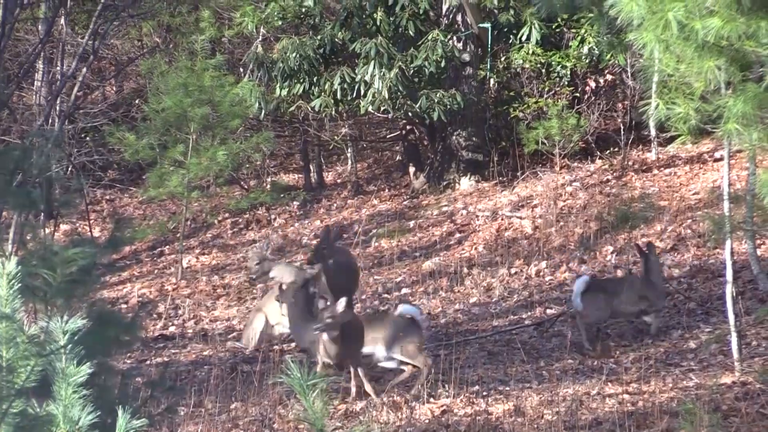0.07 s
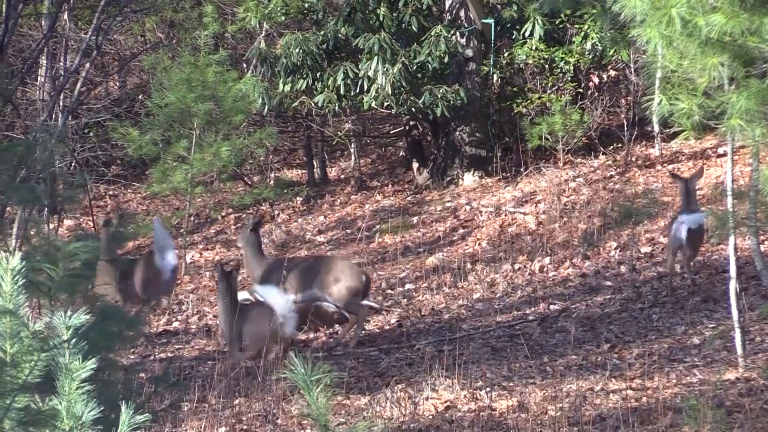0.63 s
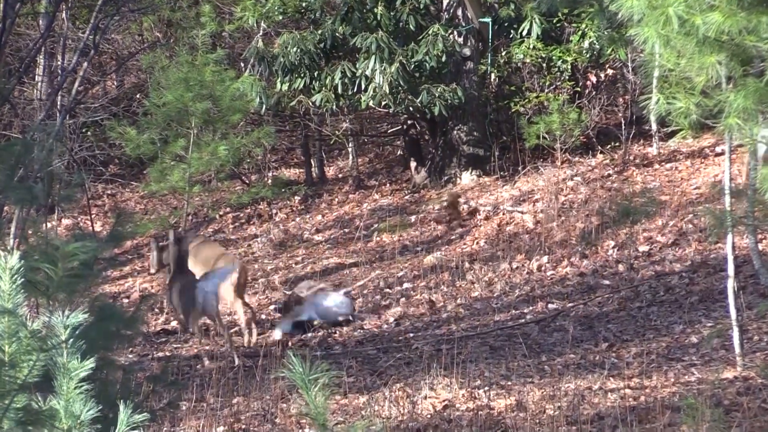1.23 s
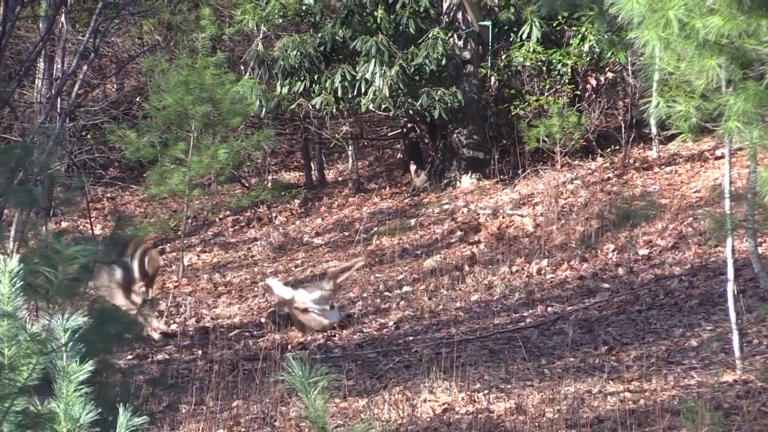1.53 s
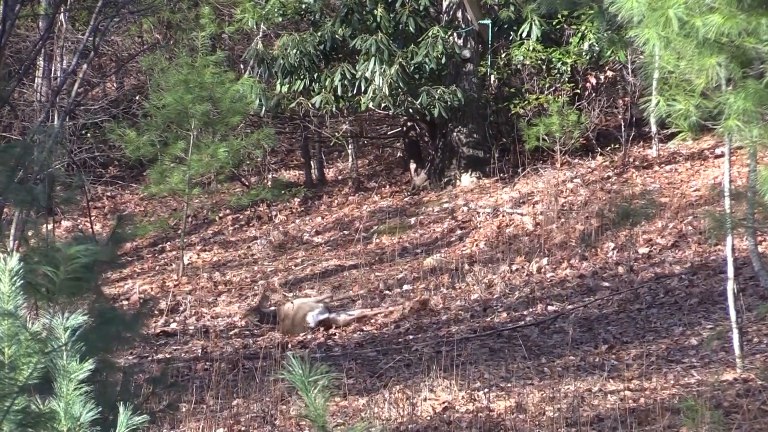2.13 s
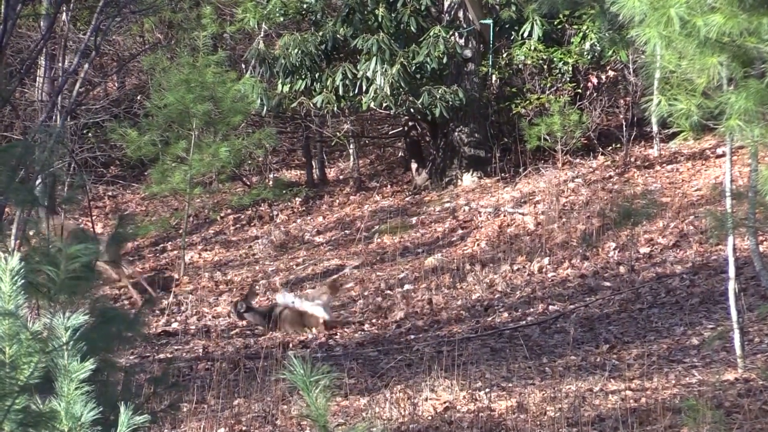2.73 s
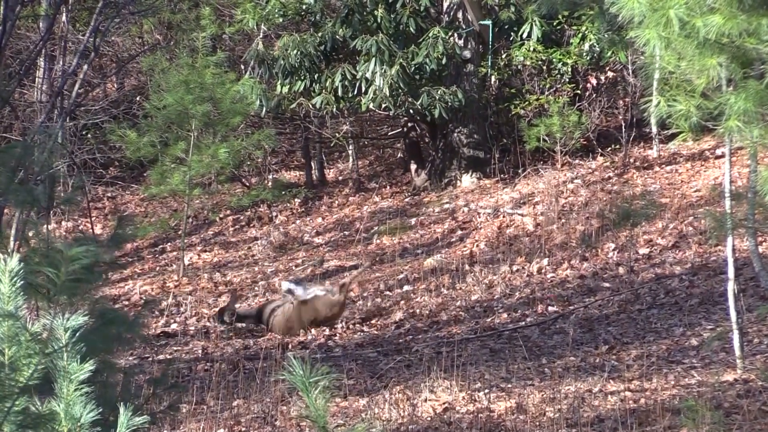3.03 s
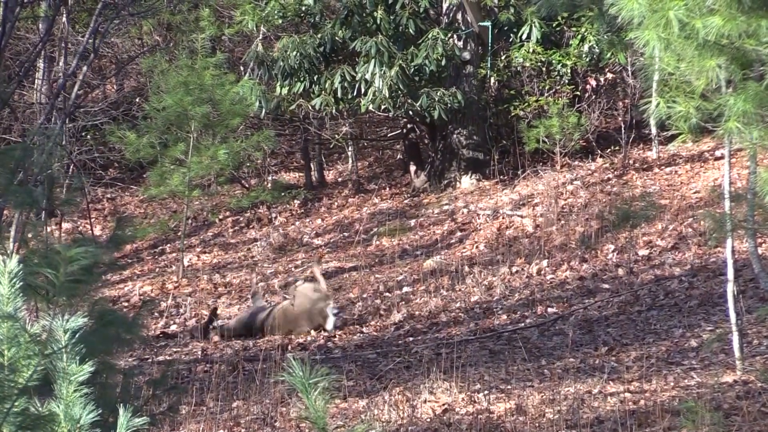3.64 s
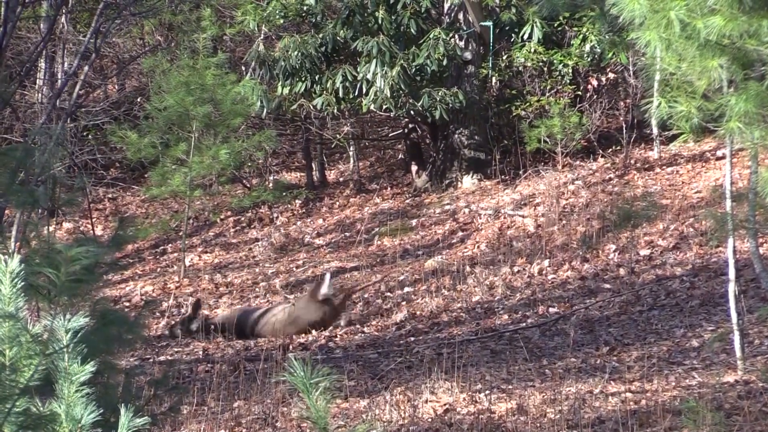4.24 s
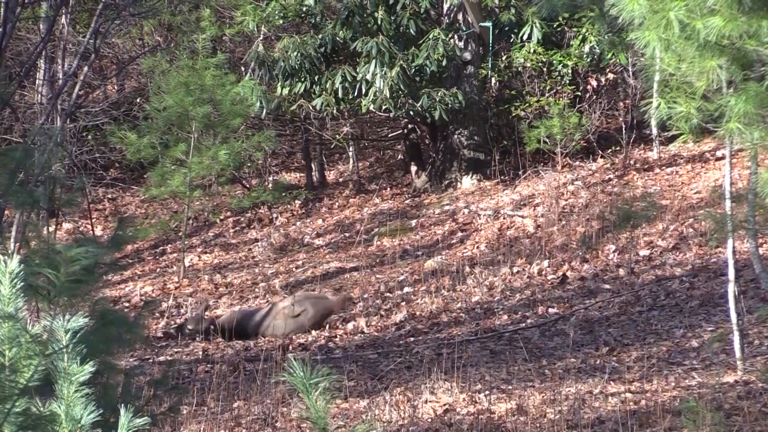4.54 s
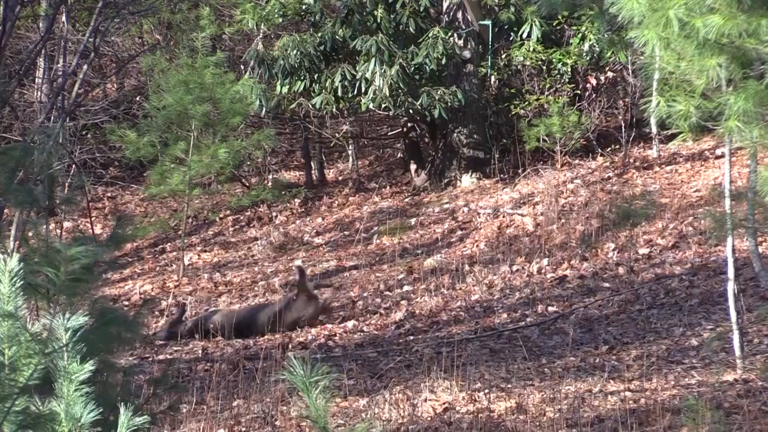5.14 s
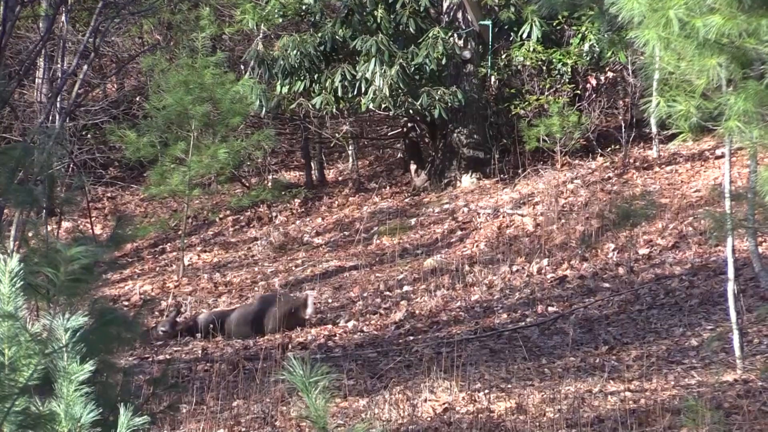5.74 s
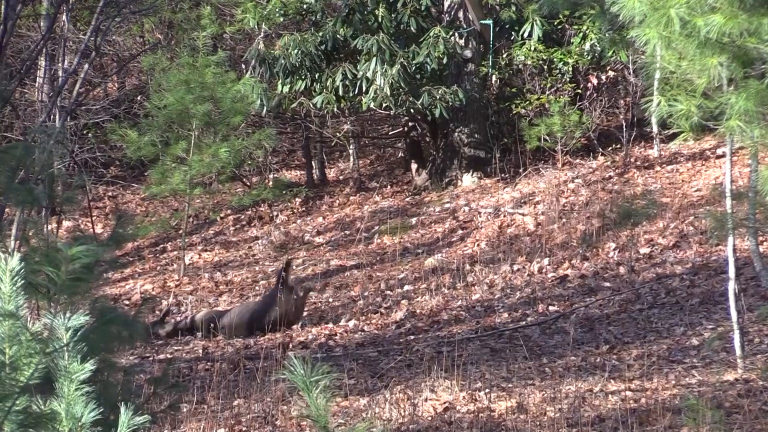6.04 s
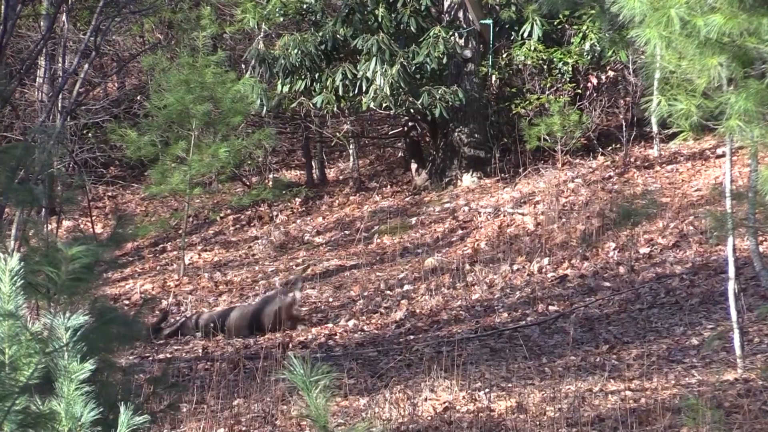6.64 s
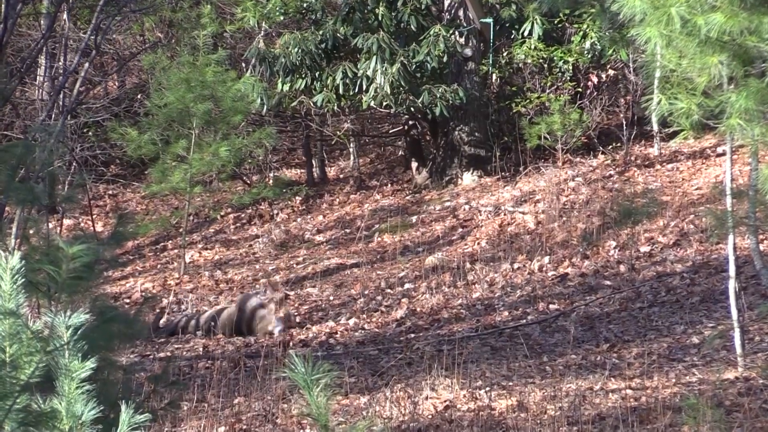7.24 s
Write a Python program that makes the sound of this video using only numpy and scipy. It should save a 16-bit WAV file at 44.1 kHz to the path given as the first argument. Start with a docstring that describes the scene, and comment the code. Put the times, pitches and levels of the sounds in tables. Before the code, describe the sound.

From the start, the echo of a rifle shot rolls back from wooded slopes, with a few sharper slaps, booming most around 1.4 seconds, then growing deeper and duller as it fades past 3 seconds. Distant deer rustle dry leaves faintly from about 1 second, with soft, low kicks on the ground around 2.7 to 4 seconds. Close by, a sleeve scuffs and steel ticks at 3.2 seconds. The bolt lifts with a clack at 3.6, then scrapes back to a very loud, sharp stop at 4.1. The brass case pings and bounces on hollow boards at 4.4, 4.7 and 5 seconds, ringing briefly in the wooden shelter. The bolt slides forward with a bright clatter at 5.8 and locks at 6.1. Faint leaf swishes follow, and the safety clicks lightly at 7.1. Soft air moves in the trees underneath. Everything is heard on the right side.

```python
"""In a wooden shelter among wooded hills, a rifle shot is heard rolling away as echoes from the slopes.
Far off, deer run and kick in dry leaves. Close by, a sleeve and hand scuff as they find the bolt. Steel
strikes and scrapes steel, the spent brass case rings in its modes and bounces on boards, a new round
slides home and the safety clicks. Soft air moves in the trees; a limiter ducks the woods at hard blows."""
import sys
import numpy as np
from scipy import signal
from scipy.fft import next_fast_len
from scipy.io import wavfile
from scipy.ndimage import uniform_filter1d

SR = 44100
rng = np.random.default_rng(int(sys.argv[2]) if len(sys.argv) > 2 else 0)


def file_out(sig):
    """Save sig as 16-bit WAV at sys.argv[1]."""
    # one column per channel
    cols = np.atleast_2d(sig).T
    # limit, then scale
    lim = np.clip(cols, -1, 1)
    pcm = np.round(lim * 32767).astype(np.int16)
    wavfile.write(sys.argv[1], SR, pcm)


N = 325899
TIME = np.arange(N) / SR
# spectrum of dry rustling, leaves and cloth alike: frequency_hz, level_db
RUSTLE_SPECTRUM = [(300, -17), (1000, 2.5), (2000, -0.5), (3400, -3.5), (4500, -1), (6500, -4), (9000, -9),
                   (12000, -17.5), (15500, -23.5)]


def shot_echoes(rise_db_per_s=80.5, fade_db_per_s=22, air_loss=3.0, air_power=1.39, start_s=0.063):
    """Scattering and air absorption: trees and slopes return the shot, and longer paths lose treble."""
    # wooded slopes, each returning one swell of scattered sound: crest_s, level_db
    slopes = [(0.02, -18), (0.17, -27), (0.33, -23), (0.48, -20), (0.698, -17), (0.81, -20.5),
              (0.979, -17.5), (1.1, -17), (1.369, -17), (1.61, -17.5), (1.86, -19.5), (2.069, -19),
              (2.18, -25), (2.36, -23), (2.61, -29)]
    # sharp reflections from bare faces: start_s, level_db
    slaps = [(0.163, 4.5), (0.561, -4), (1.123, 2), (1.803, 4), (2.315, -13), (2.7, -8)]
    # spectrum of the roll at its start: frequency_hz, level_db
    spectrum = [(24, -55), (40, -53.5), (166, -7.5), (197, -4.5), (217, -1), (298, -4), (499, -5),
                (579, -3.5), (992, -11), (1740, -14), (3550, -25), (4320, -27), (7970, -44), (14000, -70)]
    roll = power_sum(swell(s, db, rise_db_per_s, fade_db_per_s) for s, db in slopes)
    scatter = roll * grains(per_s=9000)
    for s, db in slaps:
        add(scatter, s, amp([db]))
    hz, t, bands = signal.stft(scatter, SR, nperseg=2048)
    hz = hz[:, None]
    # the roll booms most in its middle; the boom then sinks as echoes come from farther off
    boom_s, boom_spread_s, boom_peak_db = 1.4, 1.14, 7.5
    boom_hz, boom_width_octaves, sink_octaves_per_s = 330, 0.49, 0.78
    centre_hz = boom_hz * 2 ** (-sink_octaves_per_s * np.maximum(t - boom_s, 0))
    off_centre = np.log2((hz + 1) / centre_hz) / boom_width_octaves
    boom_db = boom_peak_db * np.exp(-((t - boom_s) / boom_spread_s) ** 2 - off_centre ** 2)
    absorbed_db = air_loss * (hz / 1000) ** air_power * (t - start_s)
    gain = amp(curve_at(spectrum, hz) + boom_db - absorbed_db)
    gain /= np.sqrt(np.mean(gain ** 2, axis=0))  # the colour changes, the power is kept
    return signal.istft(bands * gain, SR, nperseg=2048)[1][:N]


def bolt_clicks(click_db=-4, knock_rise_s=0.0026):
    """Impact excitation: steel snaps on steel, and the modes of the stock knock after it."""
    # handling, unlocking, back stop, loading, locking, safety:
    # start_s, level_db, relative_knock_db, tilt_db_per_octave
    clicks = [(0.555, -18, -36, -7), (3.072, -23, -17, 2.5), (3.2013, -16, -4.5, -4.5),
              (3.2393, -13, -6.5, -5), (3.6264, -9.5, 10.5, 2), (3.631, -4.5, 11, 0), (3.6428, 6, 4.5, 1.5),
              (3.6472, 15.5, -17, -4), (4.0085, -16, 4, -5), (4.014, -7, 10.5, -5),
              (4.0367, -1.5, -6, -2.5), (4.073, -10, -2, 4), (4.095, -0.5, -3, -2), (4.100, 3, -8.5, 2),
              (4.129, 7.5, -16.5, -0.5), (4.1344, 23, 0.5, 5.5), (4.149, 19.5, 3, -2.5),
              (4.167, 7, -2.5, 4), (4.1737, 5, -20, -7), (5.5939, -17, -6.5, -3.5),
              (5.6279, -27, -12.5, -0.5), (5.753, -5.5, -12, 3.5), (5.7691, 14, -4, 0.5),
              (5.778, 15, -7, 5.5), (5.795, 4, 4, -2), (5.8281, 9, 0.5, -4), (5.8386, 12, -15, -0.5),
              (6.013, -13.5, -16, 0.5), (6.022, -2.5, 1, -1), (6.082, 5, -5, -1), (6.0822, 5, -8, -4),
              (6.187, -29, -22, -5.5), (7.048, -36, -1, 3), (7.0961, -10.5, -9, 1.5)]
    # spectrum of struck steel: frequency_hz, level_db
    steel = [(60, -32.5), (250, -11.5), (550, -11.5), (750, -5.5), (1100, 0.5), (1600, -2), (2100, -3.5),
             (2800, 3.5), (3700, -5), (4700, 1.5), (6300, -6.5), (9000, -8.5), (12000, -15.5), (15500, -27)]
    # modes of the rifle's body: pitch_hz, level_db, t60_s
    stock = [(570, -16, 0.028), (1036, -9, 0.071), (1123.5, -4.5, 0.067), (1580, -15.5, 0.077),
             (2970, -24.5, 0.036), (3240, -20.5, 0.022), (4150, -27, 0.046), (5140, -22.5, .035),
             (6000, -23, 0.033)]
    out = np.zeros(N)
    for s, db, knock_db, tilt in clicks:
        add(out, s, amp(db + click_db) * burst(steel, tilt, decay_ms=3.97, rise_ms=0.18))
        knock = ring(stock, detune=0.017)
        build_up = 1 - np.exp(-TIME[:len(knock)] / knock_rise_s)
        add(out, s, amp(db + knock_db) * knock * build_up)
    return out


def bolt_scrapes(growth_power=0.42, stop_decay_s=0.0066):
    """Sliding friction: the bolt scrapes louder as it gathers speed, then dies away at the stop."""
    # strokes of the bolt: start_s, stop_s, level_at_stop_db, tilt_db_per_octave
    strokes = [(3.975, 4.065, -27, 2), (4.065, 4.17, -16.5, 8), (5.641, 5.726, -32, 1),
               (5.721, 5.77, -11.5, 0.5), (5.786, 5.815, -10.5, -1), (6.035, 6.043, -15, 3.5)]
    # spectrum of sliding steel: frequency_hz, level_db
    spectrum = [(88, -52), (150, -25.5), (450, -11), (728, -19.5), (1030, 2.5), (1380, -4.5), (1800, -5.5),
                (2310, -12.5), (2500, -4.5), (3090, -11.5), (4050, -22), (4630, -8), (5610, -25.5),
                (6060, -20), (15000, -45)]
    out = np.zeros(N)
    t = TIME[:SR // 4]
    for start_s, stop_s, db, tilt in strokes:
        progress = np.minimum(t / (stop_s - start_s), 1)
        fade = np.exp(-np.maximum(start_s + t - stop_s, 0) / stop_decay_s)
        scrape = colour(grains(per_s=10000, spread_db=3)[:len(t)], spectrum, tilt)
        add(out, start_s, amp(db) * progress ** growth_power * fade * scrape)
    return out


def handle_thumps(rise_s=0.003):
    """Body resonance: lifting the bolt handle and locking it down each thump the whole rifle."""
    # blows of the handle: start_s, level_db
    blows = [(3.627, -10), (3.649, -5.5), (6.083, -6)]
    # low modes of the rifle: pitch_hz, level_db, t60_s
    modes = [(335, -22, 0.059), (464, -8.5, 0.11), (614, 1.5, 0.059), (762, -3, 0.045)]
    out = np.zeros(N)
    for s, db in blows:
        thump = ring(modes, detune=0.046)
        build_up = 1 - np.exp(-(TIME[:len(thump)] / rise_s) ** 2)
        add(out, s, amp(db) * thump * build_up)
    return out


def magazine_zing(zing_db=-2):
    """Free vibration: the magazine's steel lips ring as a round is stripped off."""
    # the round rattling up the feed ramp: start_s, level_db
    rattles = [(5.7518, -2.5), (5.7681, 15), (5.777, 6.5), (5.792, -15)]
    # modes of the lips: pitch_hz, level_db, t60_s
    lips = [(4620, -11, 0.073), (4650, -7.5, 0.045), (4590, -0.5, 0.028), (4700, -10, .04)]
    out = np.zeros(N)
    for s, db in rattles:
        add(out, s, amp(db + zing_db) * ring(lips, detune=0.012))
    return out


def case_bounces(impact_db=-4, hollow_db=-5, hollow_rise_s=0.0022):
    """Impact excitation: the falling case clatters on hollow boards and sets their modes ringing."""
    # strikes on the boards: start_s, level_db, relative_ring_db, tilt_db_per_octave, decay_ms
    bounces = [(4.3849, -3, -8, -3, 3), (4.7073, 0, 8, 9, 9.9), (4.7087, 7, -5.5, -4, 4.4),
               (4.7114, 2.5, 5.5, -3, 5.5), (4.72, -5, 1, -10, 4.2), (4.731, -4, -0.5, -6.5, 13),
               (5.0179, -9, -21, -1.5, 24.4), (5.029, -4.5, -7, -4, 17.5), (5.0942, -21, -12, -6.5, 34),
               (5.137, -27, -4, -5.5, 40), (5.2495, -38, -15, -3, 16)]
    # spectrum of a strike: frequency_hz, level_db
    spectrum = [(59, -51), (100, -42), (275, -20), (378, -30.5), (614, -10.5), (712, -25.5), (808, -17.5),
                (1290, -21), (1660, -8.5), (2130, -13.5), (3320, -13), (3850, -23), (4100, -17.5),
                (9740, -20), (15500, -40.5)]
    # modes of the boards: pitch_hz, level_db, t60_s
    boards = [(275, -19, .07), (450, -14, .05), (440, -18, .05), (530, -9, .045), (610, -9, .045),
              (880, -6, .03), (1130, -5, .03), (1410, 0, .03), (1490, 3, .03), (1680, 3, .03),
              (1830, -5, .025)]
    out = np.zeros(N)
    for s, db, ring_db, tilt, decay_ms in bounces:
        add(out, s, amp(db + impact_db) * burst(spectrum, tilt, decay_ms, rise_ms=0.58))
        hollow = ring(boards, detune=0.013)
        build_up = 1 - np.exp(-TIME[:len(hollow)] / hollow_rise_s)
        add(out, s, amp(db + ring_db + hollow_db) * hollow * build_up)
    return out


def case_ring(brass_db=-2):
    """Beating: the thin brass tube squeals on its way out, then rings in close pairs of modes."""
    # brass leaving the chamber: start_s, length_s, pitch_hz, level_db
    squeal = (4.052, .034, 13000, -24)
    # four split pairs of tube modes: pitch_hz, level_db, t60_s
    tube = [(7754, 0, .16), (7800, -7, .13), (9447, 0, .19), (9482, -10, .17), (11407, 0, .13),
            (11445, -9, .11), (14810, -8, .11), (14865, 0, .14)]
    # blows on the case: start_s, first_pair_db, second_pair_db, third_pair_db, fourth_pair_db
    blows = [(4.0965, -4, -27.5, -5, -29.5), (4.1765, -9, 1, -15, -6), (4.3856, -52, -25.5, -66, -52),
             (4.7088, -30.5, -8, -42.5, -51), (5.0185, -60.5, -53, -49, -28)]
    out = np.zeros(N)
    s, length_s, hz, db = squeal
    t = TIME[TIME < length_s]
    envelope = np.sin(np.pi * (t / length_s) ** 2)
    add(out, s, amp(db) * envelope * np.sin(2 * np.pi * hz * t))
    for s, *pair_db in blows:
        modes = [(hz, pair_db[k // 2] + db, t60) for k, (hz, db, t60) in enumerate(tube)]
        add(out, s, amp(brass_db) * ring(modes, detune=0.0002))
    return out


def shelter_reverb(x):
    """Reverberation: the wooden shelter adds a short diffuse tail, each band dying at its own rate."""
    # reverberation times: frequency_hz, t60_s
    decay_times = [(200, 0.29), (1000, 0.33), (4000, 0.33), (9000, 0.36), (15000, 0.23)]
    hz, t, bands = signal.stft(rng.standard_normal(SR // 2), SR, nperseg=256)
    decay = amp(-60 * t / curve_at(decay_times, hz)[:, None])
    tail = signal.istft(bands * decay, SR, nperseg=256)[1]
    return signal.fftconvolve(x, tail / np.linalg.norm(tail))[:N]


def scuffs_and_ticks():
    """Friction: a sleeve and hand scuff as they find the bolt, among light ticks and leaf crunches."""
    # scuffs (3.164-3.318 s), ticks and crunches: start_s, level_db, tilt_db_per_octave, decay_ms
    touches = [(2.016, -32, 2, 2), (3.164, -29.5, 0.5, 28), (3.254, -30.5, -1.5, 16),
               (3.301, -31.5, -2.5, 22), (3.318, -29.5, -3.5, 12), (3.841, -45, 5, 3), (3.974, -36, -7, 31),
               (4.337, -33.5, -1, 7.2), (6.813, -42.5, 0, 7.2), (6.83, -46.5, -1, 22), (7.058, -46, -2, 43)]
    out = np.zeros(N)
    for s, db, tilt, decay_ms in touches:
        add(out, s, amp(db) * burst(RUSTLE_SPECTRUM, tilt, decay_ms, rise_ms=0.47))
    return out


def leaf_rustle(rise_db=24.5, fade_db=15.5):
    """Superposition: countless tiny crackles of distant leaves blur into a swelling rustle."""
    # the herd bolting, then leaving: crest_s, level_db, rise_db_per_s, fade_db_per_s
    herd = (2, -48.5, 18.5, 10.5)
    # leaps and kicks that sweep the leaves: crest_s, level_db, length_s
    swishes = [(1.22, -47.5, 0.15), (1.428, -54, 0.082), (1.61, -52, 0.21), (1.84, -46, 0.55),
               (2.02, -43.5, 0.15), (2.265, -33.5, 0.14), (2.45, -40, 0.65), (2.648, -40.5, 0.23),
               (2.894, -45, 0.27), (2.99, -45.5, 0.9), (3.546, -41, 0.14), (3.934, -50.5, 0.052),
               (6.354, -43, 0.19), (6.52, -43, 0.17), (6.834, -50.5, .12), (7.272, -55, 0.051),
               (7.38, -54, 0.088)]
    sweeps = [swell(s, db, rise_db / length_s, fade_db / length_s) for s, db, length_s in swishes]
    return power_sum([swell(*herd)] + sweeps) * colour(grains(per_s=9000), RUSTLE_SPECTRUM)


def hoof_thuds(rise_s=0.013):
    """Heavy damping: each kick on the soil gives a few cycles of a low tone."""
    # kicks on the ground: crest_s, peak_db, pitch_hz
    kicks = [(2.749, -38, 167), (2.992, -37, 128.5), (3.4, -37, 143), (3.559, -34.5, 118),
             (3.798, -32.5, 148), (3.957, -36.5, 137), (5.345, -50, 129), (5.414, -43, 129.3),
             (6.713, -44, 107), (7.199, -48, 115)]
    out = np.zeros(N)
    t = TIME[:SR // 5]
    envelope = t / rise_s * np.exp(1 - t / rise_s)
    for crest_s, db, hz in kicks:
        add(out, crest_s - rise_s, amp(db) * envelope * np.sin(2 * np.pi * hz * t))
    return out


def woods(breeze_db=-47):
    """Masking: the last wash of the shot sinks into the soft steady noise of air in the trees."""
    # return from the farthest hills: crest_s, level_db, rise_db_per_s, fade_db_per_s
    far_hills = (4, -36, 5.5, 8.5)
    # spectrum of the breeze and the wash: frequency_hz, level_db
    spectrum = [(25, -35), (50, -16.5), (100, -5), (200, -7), (350, -3), (550, -7), (850, -13), (1500, -17),
                (2600, -20), (3600, -24), (4600, -22.5), (7000, -31.5), (15000, -47)]
    return power_sum([amp(breeze_db), swell(*far_hills)]) * colour(rng.standard_normal(N), spectrum)


def burst(spectrum, tilt_db_per_octave, decay_ms, rise_ms):
    """Modal overlap: a blow on a body with countless short modes gives fast-dying coloured noise."""
    ms = np.arange(SR // 5) * 1000 / SR
    envelope = (1 - np.exp(-ms / rise_ms)) * np.exp(-ms / decay_ms)
    return colour(rng.standard_normal(len(ms)) * envelope, spectrum, tilt_db_per_octave)


def ring(modes, detune):
    """Modal decay: a sum of damped sines, each slightly off pitch from blow to blow."""
    t = TIME[TIME < 2 * max(t60 for hz, db, t60 in modes)]
    out = np.zeros(len(t))
    for hz, db, t60 in modes:
        pitch_hz = hz * (1 + detune * rng.standard_normal())
        out += amp(db - 60 * t / t60) * np.sin(2 * np.pi * pitch_hz * t)
    return out


def grains(per_s, spread_db=0):
    """A Poisson process of tiny clicks; a spread makes a few of them much larger."""
    size = amp(spread_db * np.minimum(rng.exponential(1, N), 4))
    return unit_rms(size * rng.standard_normal(N) * (rng.random(N) < per_s / SR))


def colour(x, spectrum, tilt_db_per_octave=0):
    """Minimum-phase filtering to a given spectrum, tilted about 3 kHz, with mean power gain 1."""
    size = next_fast_len(len(x))
    hz = abs(np.fft.fftfreq(size, 1 / SR))
    octaves = np.log2(np.maximum(hz, 400) / 3000)
    gain = unit_rms(amp(curve_at(spectrum, hz) + tilt_db_per_octave * octaves))
    response = np.exp(np.conj(signal.hilbert(np.log(gain))))
    return np.fft.ifft(np.fft.fft(x, size) * response).real[:len(x)]


def swell(crest_s, db, rise_db_per_s, fade_db_per_s):
    """Exponential growth of a gain to its crest, then exponential decay."""
    before_s, after_s = np.maximum(crest_s - TIME, 0), np.maximum(TIME - crest_s, 0)
    return amp(db - rise_db_per_s * before_s - fade_db_per_s * after_s)


def power_sum(gains):
    """Incoherent addition: unrelated sounds add in power."""
    return np.sqrt(sum(gain ** 2 for gain in gains))


def curve_at(points, hz):
    """Interpolation along a log-frequency axis."""
    point_hz, values = np.transpose(points)
    return np.interp(np.log(hz + 1), np.log(point_hz + 1), values)


def amp(db):
    """Decibels to amplitude gain."""
    return 10 ** (np.asarray(db) / 20)


def unit_rms(x):
    """Normalisation to rms 1."""
    return x / np.sqrt(np.mean(x ** 2) + 1e-20)


def add(mix, start_s, sound):
    """Superposition of a sound on the mix from start_s."""
    part = mix[max(round(start_s * SR), 0):][:len(sound)]
    part += sound[:len(part)]


def scene(rifle_room_db=-27, case_room_db=-11, leak_db=-57, hiss_db=-76):
    """Superposition at one microphone on the right channel; the left has only crosstalk and hiss."""
    rifle = bolt_clicks() + bolt_scrapes() + handle_thumps() + magazine_zing()
    case = case_bounces() + case_ring()
    room = shelter_reverb(amp(rifle_room_db) * rifle + amp(case_room_db) * case)
    right = shot_echoes() + rifle + case + room
    right += leaf_rustle() + scuffs_and_ticks() + hoof_thuds() + woods()
    hiss_spectrum = [(30, -22), (300, -15), (3000, -10), (15000, -17)]  # frequency_hz, level_db
    hiss = amp(hiss_db) * colour(rng.standard_normal(N), hiss_spectrum)
    return np.array([amp(leak_db) * right + hiss, right])


def record(dry, ceiling_db=-1, recover_s=0.33, cutoff_hz=15750):
    """Peak limiting: the gain ducks at each peak and recovers ever more slowly; then clip and low-pass."""
    peak_db = 20 * np.log10(abs(dry).max(0) + 1e-9)
    over_db = np.maximum(peak_db - ceiling_db, 0)
    release = np.exp(-TIME / recover_s)
    duck_db = np.maximum.accumulate(over_db / release) * release
    limited = np.clip(dry * amp(-uniform_filter1d(duck_db, size=40)), -1, 1)
    low_pass = signal.firwin(511, cutoff_hz, window=("kaiser", 9), fs=SR)
    return signal.oaconvolve(limited, low_pass[None], "same")


dry = scene()
out = record(dry)
file_out(out)
```